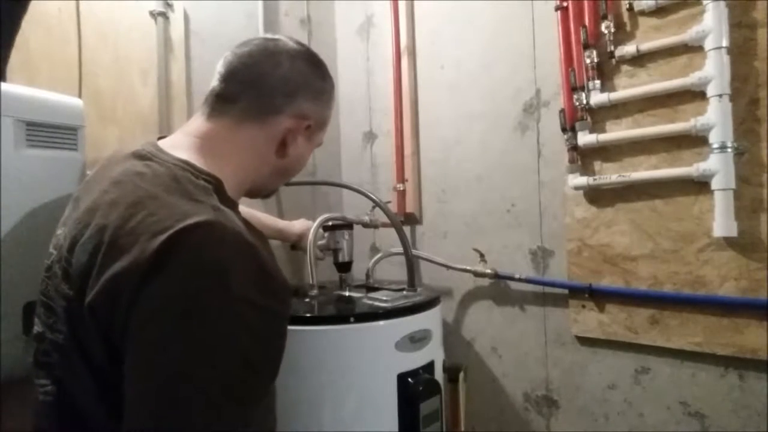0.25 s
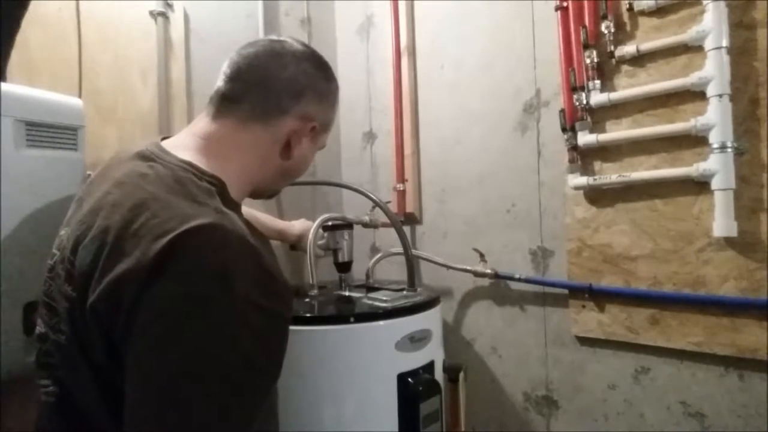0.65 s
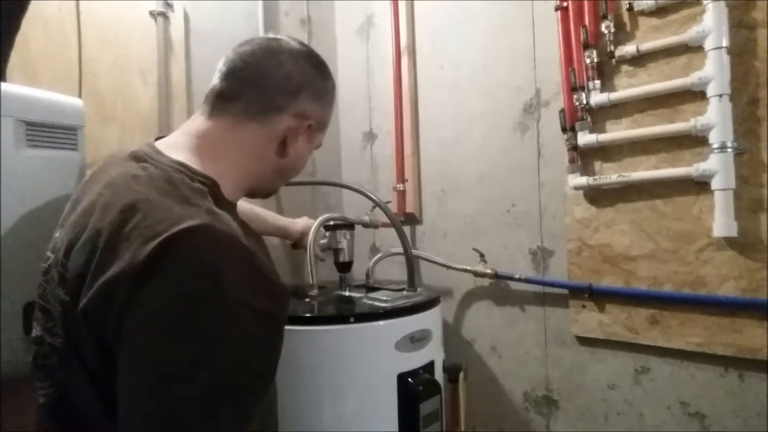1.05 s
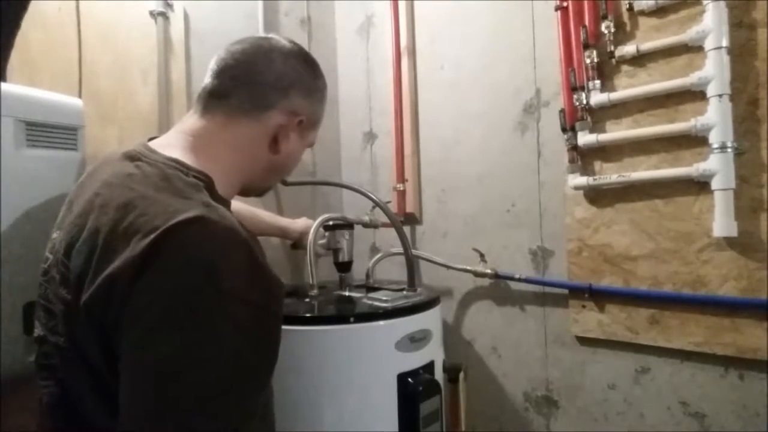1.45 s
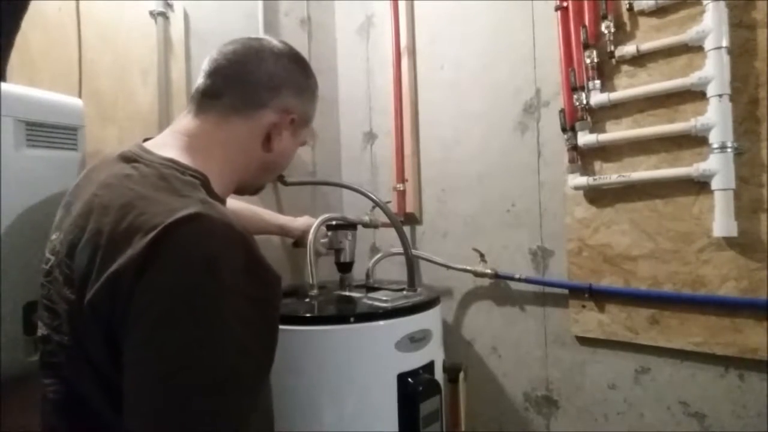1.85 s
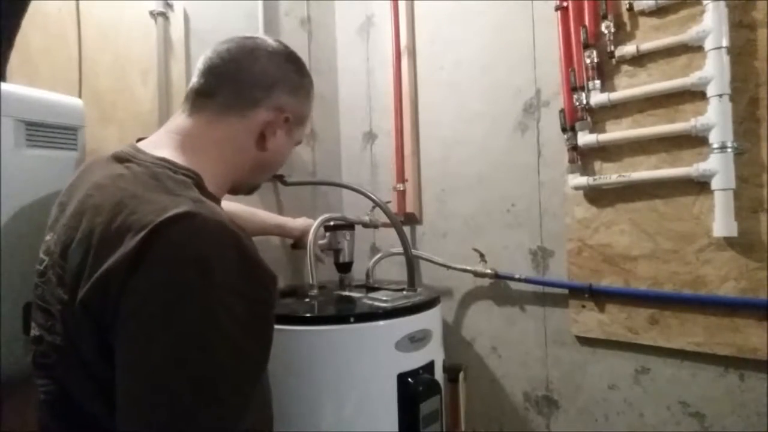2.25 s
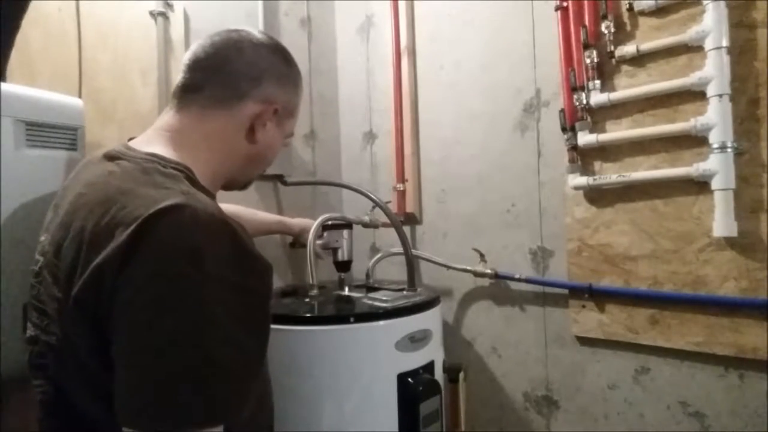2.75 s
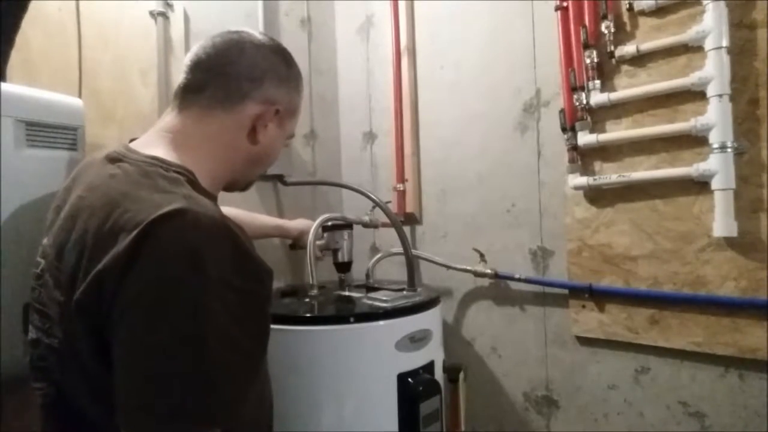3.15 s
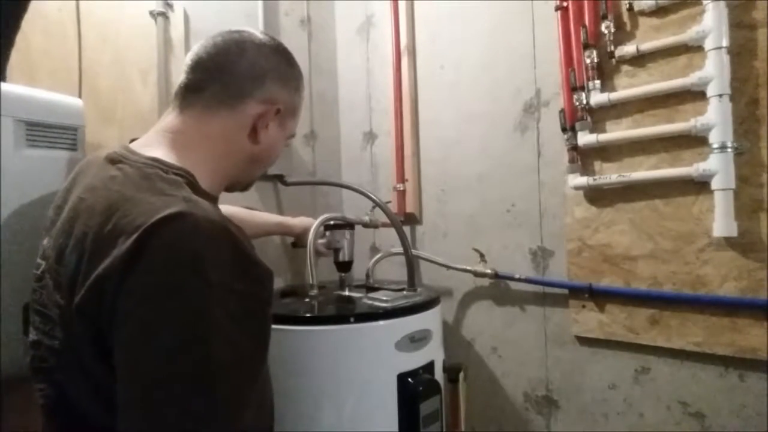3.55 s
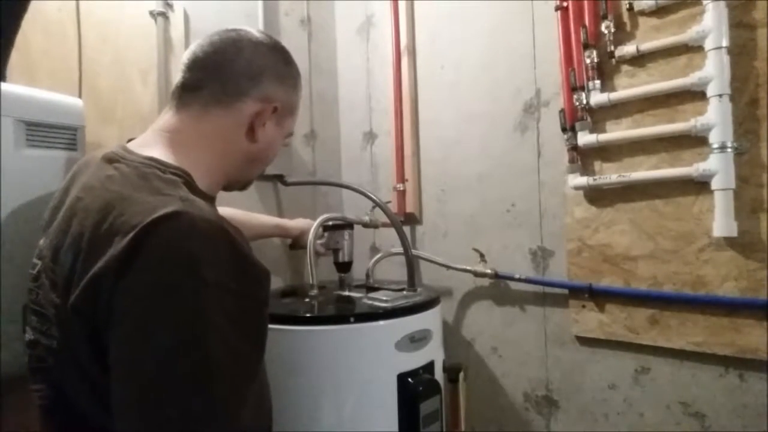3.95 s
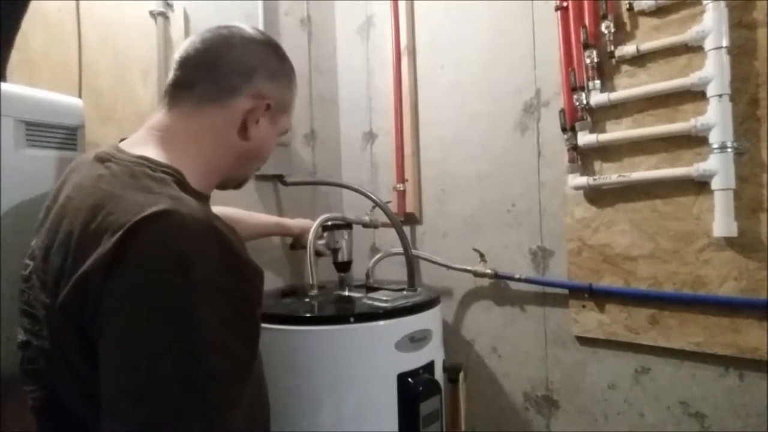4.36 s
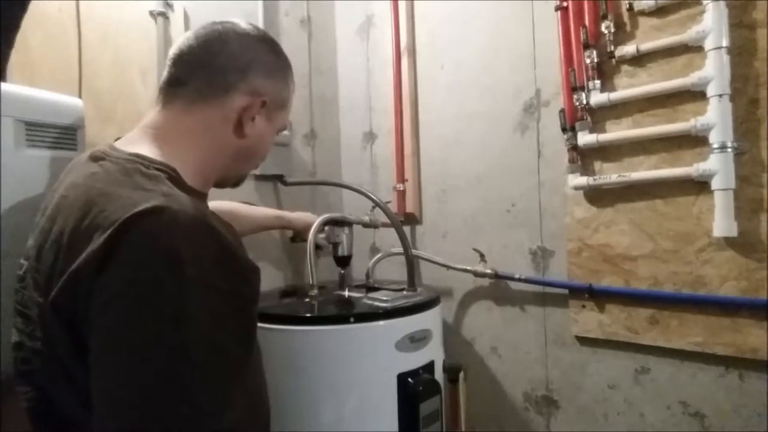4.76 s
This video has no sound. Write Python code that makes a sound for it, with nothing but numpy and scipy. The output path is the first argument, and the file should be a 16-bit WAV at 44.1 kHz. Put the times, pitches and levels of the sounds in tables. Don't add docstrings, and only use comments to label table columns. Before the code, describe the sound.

A small hard-walled basement with low microphone hiss, faint cloth rustle and tiny bumps. At 0.44 s an air impact wrench starts: bright exhaust hiss, a fluttering vane-motor whirr, a few separate clacks, then hammering at about 27 blows a second until 0.95, ending in a hard clack. The steel tank rattles and rod threads grind; a low hollow note near 128 Hz lingers. A tiny valve tick comes at 1.16. The longest burst runs from 1.45 to 2.05, slowing through strong clacks and air puffs to 2.2. A weaker tick follows at 2.37, then quiet rustle and a double knock on the lid at 3.0. Short jabs at 3.43 and 3.96 last about 0.1 s under power, each coasting down in a few irregular clacks and puffs, until about 3.75 and 4.45. The drum note fades; faint handling bumps and a small socket click at 4.7 finish.

```python
import sys
import numpy as np
from scipy import signal
from scipy.fft import rfft, irfft, next_fast_len
from scipy.io import wavfile
from scipy.ndimage import uniform_filter1d

SR = 44100
rng = np.random.default_rng(int(sys.argv[2]) if len(sys.argv) > 2 else 0)


def wav_out(sig):
    wavfile.write(sys.argv[1], SR, np.round(np.clip(np.atleast_2d(sig).T, -1, 1) * 32767).astype(np.int16))


def gain_from_db(level_db):
    decades = np.asarray(level_db, float) / 20
    return 10 ** decades


N = 221117
SIZE = next_fast_len(N + SR // 2)
STEP = 32
PARTS = 3

# freq_hz, density_db
FLOOR = [(20, 22), (55, 27), (110, 5.5), (300, -10), (900, 2.5), (1500, -2), (4000, -6.5), (10000, -5.5),
         (15000, -6.5)]
# start_s, level_db
RUSTLE = [
    (.0, -68.5),
    (1.25, -72.5),
    (2.4, -76),
    (3.03, -69),
    (3.3, -72.5),
    (4.75, -89),
]
# freq_hz, density_db
RUSTLE_COLOUR = [(100, -29.5), (170, 2.5), (361, -5.5), (391, -6.5), (489, -9.5), (579, -16.5),
                 (634, -19.5), (2500, -41), (3250, -73.5), (5500, -120)]
# start_s, peak_db
BUMPS = [
    (0.051, -66),
    (.075, -64.5),
    (.11, -73),
    (2.978, -71.5),
    (2.999, -50),
    (3.02, -54),
    (3.046, -71),
    (4.535, -70),
    (4.679, -68),
    (5.0, -68.5),
]
# freq_hz, density_db
KNOCK_COLOUR = [(150, -19), (380, -3.0), (520, 8.0), (700, -1.5), (1100, -17.5), (2000, -31), (6000, -50)]
# start_s, level_db, t60_s
RECOIL = [(.1, -66, 1), (.24, -66, 1.5), (.42, -39, 1.8), (.62, -54.5, .3), (1.0, -61.5, 1),
          (1.22, -66, 1.1), (1.44, -43, 0.33), (2.12, -54.5, 0.54), (2.96, -73, 1.8), (3.26, -66.5, 1),
          (3.41, -45, .25), (3.67, -53, .4), (3.96, -37.5, .15), (4.3, -58.5, 0.71), (4.64, -72.5, 0.55)]
# freq_hz, density_db
RECOIL_COLOUR = [(18, -33), (35, -14), (55, 5), (70, -2), (95, 0.5), (130, -16.5), (250, -62.5)]

# open_s, release_s, closing_time_s, full_flow_db, grind_over_shake_db
PULLS = [
    (0.437, 0.928, 0.091, -17.5, -1),
    (1.449, 2.048, 0.092, -17, -1.5),
    (3.434, 3.55, 0.083, -16, 0.5),
    (3.964, 4.09, .11, -14.5, 2),
]
# start_s, level_db, t60_s
PUFFS = [
    (.995, -32.5, 0.19),
    (2.147, -25.5, 0.16),
    (3.597, -22, 0.21),
    (3.649, -20.5, 0.16),
    (4.19, -25, 0.22),
    (4.271, -26, .15),
]
# freq_hz, density_db
HISS = [(2470, -32), (4200, -13.5), (5700, -2.5), (6330, -6.5), (7830, -3), (8640, 1.5), (11000, 2),
        (11900, -1), (14400, 0), (15500, -17)]
# freq_hz, density_db
WHIRR = [(1240, -31.5), (2100, -6), (2690, 2.5), (2930, 0.5), (3190, 1), (3670, -5), (4500, -8),
         (5850, -28), (9900, -120)]
# time_s, level_db
LOAD = [
    [(.439, -61), (.497, -39.5), (.7, -34), (.889, -28), (.95, -32.5), (.997, -29), (1.08, -55.5)],
    [(1.454, -57.5), (1.472, -40.5), (1.53, -32), (1.74, -30), (1.765, -27), (1.93, -34.5), (2.1, -30.5),
     (2.15, -33.5), (2.22, -51)],
    [(3.435, -63.5), (3.483, -42), (3.553, -37), (3.64, -44.5), (3.7, -33), (3.74, -44), (3.8, -63)],
    [(3.965, -60), (4.007, -43), (4.1, -37), (4.197, -35.5), (4.263, -43), (4.277, -37.5), (4.36, -56.5)],
]
# freq_hz, density_db
GRIND = [(440, -27.5), (750, -6), (878, 2), (1090, -2.5), (1140, -3), (1590, -0.5), (2200, -10),
         (2860, -30), (4840, -120)]

# freq_hz, density_db
RATTLE = [(88, -33), (150, -0.5), (162, -10.5), (334, -14.5), (425, -2.5), (488, 0.5), (534, -5.5),
          (626, -3.5), (780, -11), (1010, -40), (1720, -120)]
# pitch_hz, level_db, t60_s
SHELL = [(437.4, -1.5, 0.3), (492.3, -1, 0.24), (517, -17, 0.2), (655, -5.5, 0.22), (674.3, 0, 0.15),
         (818, -1.5, 0.18), (888, -5.5, 0.17), (1063.4, 5.5, 0.081), (1185, -14, .22)]
# pitch_hz, level_db, t60_s
SEAM = [(879, -49, 3), (368, -20, .8), (374, -23, .8), (277, -19, 1.1)]
# start_s, level_db, t60_s
DRUM = [(.44, -37.5, 1.8), (.56, -46.5, 0.27), (.645, -33, 0.7), (0.859, -35.5, 0.66), (1.04, -38.5, .85),
        (1.46, -34, 0.26), (1.566, -40, 0.48), (1.691, -37.5, 0.401), (1.949, -40.5, 2.4),
        (2.15, -33.5, .8), (2.29, -40.5, 3.1), (3.01, -51.5, 11), (3.435, -38, 0.47), (3.6, -40.5, 0.38),
        (3.77, -47, 1.7), (3.99, -41, 0.16), (4.135, -36.5, 0.17), (4.245, -33.5, .3), (4.37, -46, 1.9)]
# start_s, peak_db, pitch_hz
JERKS = [
    (0.441, -36.5, 194.5),
    (0.464, -29.5, 99),
    (1.46, -36, 197.1),
    (1.478, -32, 95.4),
    (2.092, -35, 247.5),
    (3.451, -28.5, 107),
    (3.459, -33, 219.5),
    (3.623, -30.5, 231.5),
    (3.994, -33, 197.5),
    (4.16, -31, 222),
]

# start_s, peak_db, thud_db, bright_db
CLACKS = [(0.449, -34, -5.5, -10), (0.4648, -26, -1, -13.5), (0.5066, -17, -0.5, -2.5),
          (0.5618, -19, -2, -12), (0.603, -15.5, -3.5, 2), (0.9886, -9.5, -13, -10),
          (1.463, -25.5, -1.5, -9), (2.0466, -7.5, -16.5, -9), (2.069, -17, -8, -10.5),
          (2.0973, -17, -3, -15), (2.1483, -8.5, -8.5, -12), (3.4484, -24.5, -10.5, -8.5),
          (3.5473, -19.5, -14.5, 1), (3.602, -21.5, -18.5, 0), (3.6307, -38, -5.5, -19),
          (3.6505, -13, -6, -9.5), (3.9838, -21, -9, -19.5), (4.0009, -18.5, -11, -9),
          (4.1373, -18.5, -5, -14.5), (4.1932, -12, 0, -8), (4.2717, -12, -11, -8.5),
          (4.4175, -41, -3.5, -16), (4.4444, -31, 1, -32.5), (4.4521, -29, -8, -35),
          (4.533, -54.5, 2.5, -40)]
# start_s, end_s, rate_hz, peak_db
HAMMERING = [
    (0.639, .96, 27.2, -12.5),
    (1.511, 2.03, 26.2, -14),
]
# freq_hz, density_db
CLACK = [(470, -33.5), (800, -9.5), (2380, -4), (2700, -5.5), (3420, -12.5), (5580, -7.5), (6330, -11.5),
         (12100, -1.5), (16000, 0.5)]
# pitch_hz, level_db, t60_s
ANVIL = [(1540, 0.5, .06), (2105, -3.5, 0.067), (2725, 2, 0.047), (4300, -7.5, 0.018), (5650, -8.5, 0.043),
         (7700, -6.5, .14)]

# start_s, peak_db
TICKS = [
    (1.1644, -54.5),
    (2.365, -61),
]
# freq_hz, density_db
TICK = [(1500, -9), (3500, -10), (5800, 0), (8000, -4), (11000, -7), (16000, -13)]
# pitch_hz, level_db, t60_s
TICK_MODES = [(5480, -2, .2), (5620, -4, .25), (5720, -5, 0.1), (5950, 3.5, 0.097), (6470, -2.5, 0.045)]
# pitch_hz, level_db, t60_s
SOCKET = [(3800, 0, .03), (4170, 0, .03)]

# freq_hz, t60_s
ROOM_T60 = [(100, 0.67), (260, 0.27), (700, 0.27), (1840, 0.22), (4850, .2), (12800, 0.13)]
# freq_hz, left_minus_right_db
SIDES = [(60, 1), (92, -0.5), (140, 2), (210, -2), (330, 3.5), (500, 5.0), (770, -6), (1170, 4), (1790, 1),
         (2740, 2.5), (4190, 10.5), (6410, 13.5), (9810, -3.5), (15000, 0.5)]


def rms_one(x):
    return x / np.sqrt(np.mean(x ** 2) + 1e-20)


def at_hz(points, hz):
    table_hz, values = np.transpose(points)
    return np.interp(np.log(hz), np.log(table_hz), values)


def butter(x, order, hz, kind="low"):
    return signal.sosfilt(signal.butter(order, hz, kind, fs=SR, output="sos"), x)


def coloured(x, spectrum):
    hz = np.clip(np.arange(SIZE // 2 + 1) * SR / SIZE, 1, 14600)
    cepstrum = irfft(at_hz(spectrum, hz) * np.log(10) / 20, SIZE)
    cepstrum[1:SIZE // 2] *= 2
    cepstrum[SIZE // 2 + 1:] = 0
    shape = np.exp(rfft(cepstrum))
    shape = shape / np.sqrt(np.mean(abs(shape) ** 2))
    return irfft(rfft(x, SIZE) * shape, SIZE)[..., :N]


def noise():
    return rng.standard_normal((PARTS, N)) / np.sqrt(PARTS)


def stereo_noise(spectrum):
    both, left, right = coloured(rng.standard_normal((3, N)), spectrum)
    return both, np.array([left, right])


def flutter(hz, depth_db):
    lowpass = signal.butter(2, hz, fs=SR / 8, output="sos")
    slow = signal.sosfilt(lowpass, rng.standard_normal((PARTS, N // 8 + 1)))
    return gain_from_db(depth_db * np.repeat(rms_one(slow), 8, axis=1)[:, :N])


def patchy(x):
    spectrum = signal.stft(x, nperseg=256)[2]
    field = uniform_filter1d(rng.standard_normal(spectrum.shape[1:]), size=4, axis=1)
    field = rms_one(uniform_filter1d(field, size=4, axis=0))
    return signal.istft(spectrum * gain_from_db(1.5 * field), nperseg=256)[1][:, :N]


def clicks(times_s, levels_db):
    out = np.zeros(N)
    places = np.round(np.array(times_s) * SR).astype(int)
    out[np.minimum(places, N - 1)] = gain_from_db(levels_db)
    return out


def burst(train, t60_s):
    return signal.lfilter([1], [1, -gain_from_db(-60 / (t60_s * SR))], train) * noise()


def ring(x, modes):
    out = 0
    for hz, level_db, t60_s in modes:
        radius, angle = gain_from_db(-60 / (t60_s * SR)), 2 * np.pi * hz / SR
        poles = [1, -2 * radius * np.cos(angle), radius ** 2]
        out = out + gain_from_db(level_db) * signal.lfilter([0, np.sin(angle)], poles, x + 1e-18)
    return out


def controls():
    return np.arange(0, N + STEP, STEP) / SR


def per_sample(gain):
    return np.interp(np.arange(N) / SR, controls(), gain)


def swells(rows, rise_s):
    t, gain = controls(), 0
    for start_s, level_db, t60_s in rows:
        rise = np.clip((t - start_s) / rise_s, 0, 1) ** 2
        decay_db = -60 * np.maximum(t - start_s - rise_s, 0) / t60_s
        gain = gain + rise * gain_from_db(level_db + decay_db)
    return per_sample(gain)


def air(start_db):
    opening_s, shut_db, closing_db, spin_up_s = 0.032, -50, -24, 0.12
    t, gain = controls(), 0
    for open_s, release_s, closing_s, full_db, _ in PULLS:
        since = np.maximum(t - open_s, 0)
        opening = shut_db * np.clip(1 - since / opening_s, 0, 1) ** 1.8
        closing = closing_db * (np.maximum(t - release_s, 0) / closing_s) ** 2
        speed = start_db * np.exp(-since / spin_up_s)
        gain = gain + (t > open_s) * gain_from_db(np.maximum(full_db + speed + opening + closing, -200))
    return per_sample(gain) + swells(PUFFS, rise_s=0.005)


def load(grind_share=0):
    t, gain = np.arange(N) / SR, np.zeros(N)
    for rows, pull in zip(LOAD, PULLS):
        time_s, level_db = np.transpose(rows)
        active = (t > time_s[0]) * (t < time_s[-1])
        gain += gain_from_db(np.interp(t, time_s, level_db) + grind_share * pull[-1]) * active
    return uniform_filter1d(gain, size=120)


def background():
    both, sides = stereo_noise(RUSTLE_COLOUR)
    gain = swells([(start_s, level_db, 0.75) for start_s, level_db in RUSTLE], rise_s=0.027) + gain_from_db(-76)
    rustle = gain * flutter(25, 1.5)[0] * 0.54 * (both + sides)
    return rustle + gain_from_db(-87.5) * coloured(rng.standard_normal((2, N)), FLOOR)


def bumps():
    knock = coloured(burst(clicks(*np.transpose(BUMPS)), t60_s=0.045), KNOCK_COLOUR)
    return butter(gain_from_db(3.0) * knock, 4, 130, "high")


def recoil():
    both, sides = stereo_noise(RECOIL_COLOUR)
    running = gain_from_db(-47.5) * air(start_db=-11)
    gain = swells(RECOIL, rise_s=0.046) + running + gain_from_db(-77.5)
    return gain * (0.4 * both + 0.26 * sides)


def exhaust():
    dull_hz, dull_follows, open_db = 11000, 0.45, -20.5
    flow = air(start_db=-11)
    jet = flow * flutter(50, 0.69) * patchy(coloured(noise(), HISS))
    top = butter(flow * coloured(noise(), HISS), 2, dull_hz, "high")
    return jet + top * gain_from_db(-4.5) * (flow / gain_from_db(open_db)) ** dull_follows


def motor():
    return gain_from_db(-14) * air(start_db=-16.5) * flutter(45, 3.7) * patchy(coloured(noise(), WHIRR))


def grind():
    return load(grind_share=1) * flutter(30, 4.0) * coloured(noise(), GRIND)


def shell(thud):
    shake = load() * flutter(21, 4.27) * noise()
    spread = signal.lfilter([.004], [1, -gain_from_db(-60 / (0.045 * SR))], thud)
    rattle = gain_from_db(-1.0) * coloured(shake + gain_from_db(-10) * burst(spread, t60_s=0.06), RATTLE)
    drive = gain_from_db(-43.5) * shake + gain_from_db(-40.5) * burst(thud, t60_s=0.018)
    return butter(rattle + ring(drive, SHELL + SEAM), 4, 130, "high")


def drum():
    pitch_hz, swell_s, rest_db = 128.1, 0.032, -71
    t, gain = controls(), 0
    for start_s, level_db, t60_s in DRUM:
        taken = np.clip((t - start_s) / swell_s, 0, 1)
        decay_db = -60 * np.maximum(t - start_s - swell_s, 0) / t60_s
        gain = (1 - taken) * gain + taken * gain_from_db(level_db + decay_db)
    running = load() > 1e-4
    scatter = np.cumsum((0.014 * running + .002) * rng.standard_normal(N))
    note = np.sin(2 * np.pi * pitch_hz * np.arange(N) / SR + scatter)
    return np.sqrt(2) * per_sample(gain + gain_from_db(rest_db)) * note


def lid():
    t60_s = 0.14
    out, t = np.zeros(N), np.arange(SR // 5) / SR
    for start_s, peak_db, pitch_hz in JERKS:
        gain = np.clip(t * pitch_hz / 2, 0, 1) * gain_from_db(peak_db - 60 * t / t60_s)
        first = round(start_s * SR)
        out[first:first + len(t)] += gain * np.sin(2 * np.pi * pitch_hz * t)
    return gain_from_db(-2.0) * out


def blows():
    start_s, peak_db, thud_db, bright_db = np.transpose(CLACKS)
    crack = clicks(start_s, peak_db)
    top = clicks(start_s, peak_db + bright_db + 6.5)
    thud = clicks(start_s, peak_db + thud_db)
    for start_s, end_s, rate_hz, level_db in HAMMERING:
        steady_s = np.arange(start_s, end_s, 1 / rate_hz)
        time_jitter, level_jitter = rng.standard_normal((2, len(steady_s)))
        train = clicks(steady_s + 0.0019 * time_jitter, level_db + 4.5 * level_jitter)
        crack, top, thud = crack + train, top + train, thud + gain_from_db(-15.5) * train
    return crack, top, thud


def hammer(crack, top):
    split_hz = 9500
    body = butter(burst(crack, t60_s=.02), 4, split_hz)
    edge = burst(top, t60_s=0.024) + gain_from_db(1.5) * burst(top, t60_s=0.0017)
    edge = butter(edge, 4, split_hz, "high")
    return gain_from_db(1.8) * coloured(body + edge, CLACK) + gain_from_db(-34) * ring(burst(crack, t60_s=.003), ANVIL)


def valve():
    train = clicks(*np.transpose(TICKS))
    tick = gain_from_db(-0.5) * coloured(burst(train, t60_s=0.017), TICK)
    return tick + gain_from_db(-33.5) * ring(burst(train, t60_s=0.0043), TICK_MODES)


def socket():
    return ring(clicks([4.702], [-92]), SOCKET)


def room(x, wet_db):
    t, tail = np.arange(SR // 2) / SR, 0
    edges_hz = 40 * 2 ** np.arange(0, 9, .5)
    white = rng.standard_normal((2, 3, PARTS, len(t)))
    for k, (low_hz, high_hz) in enumerate(zip(edges_hz, np.append(edges_hz[1:], 19000))):
        both, left, right = butter(white[k % 2], 2, [low_hz, high_hz], "band")
        t60_s = at_hz(ROOM_T60, low_hz * 2 ** 0.17)
        share = 1.0 / (1 + (low_hz / 300) ** 2)
        pair = np.sqrt(share) * both + np.sqrt(1 - share) * np.array([left, right])
        late = gain_from_db(-51.5 - 60 * t / (3.8 * t60_s))
        tail = tail + pair * (gain_from_db(-60 * t / t60_s) + late) / np.sqrt(t60_s * SR / 13.8)
    tail = gain_from_db(wet_db) * tail * np.clip(5 - 10 * t, 0, 1) * np.clip((t - .0015) / 0.00097, 0, 1)
    spots = np.arange(PARTS)
    tail[0, :, 0] = 0.86
    tail[1, spots, 4 + 8 * spots] = .5
    return irfft(np.sum(rfft(x, SIZE) * rfft(tail, SIZE), axis=1), SIZE)[:, :N]


def scene():
    crack, top, thud = blows()
    wrench = butter(exhaust() + motor() + grind() + hammer(crack, top), 3, 300, "high")
    tank = bumps() + shell(thud) + lid()
    heard = room(wrench + tank + valve() + socket(), wet_db=-2.0)
    drum_sides = gain_from_db(np.array([[.4], [-.4]]))
    return heard + background() + recoil() + drum() * drum_sides


def low_pass(x):
    return signal.sosfilt(signal.butter(12, 16950, fs=SR, output="sos"), x)


def record(dry):
    hz = np.maximum(np.arange(SIZE // 2 + 1) * SR / SIZE, 1)
    ports = gain_from_db(np.array([[.5], [-.5]]) * at_hz(SIDES, hz))
    mix = irfft(rfft(dry, SIZE) * ports, SIZE)[:, :N]
    mix = signal.sosfilt(signal.ellip(12, .5, 75, 15950, fs=SR, output="sos"), mix)
    return low_pass(mix)


dry = scene()
out = record(dry)
wav_out(out)
```